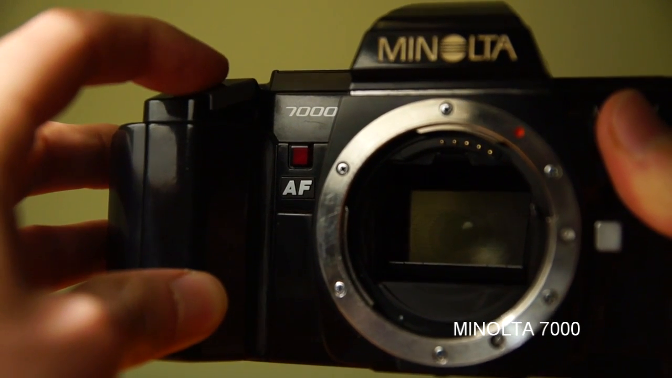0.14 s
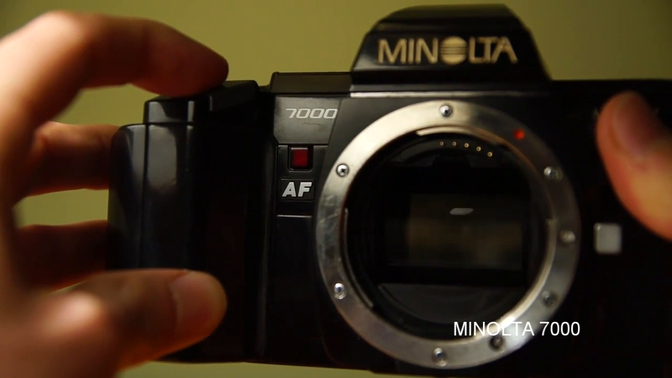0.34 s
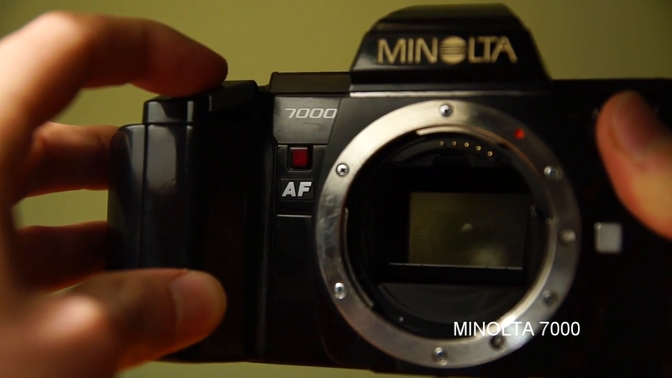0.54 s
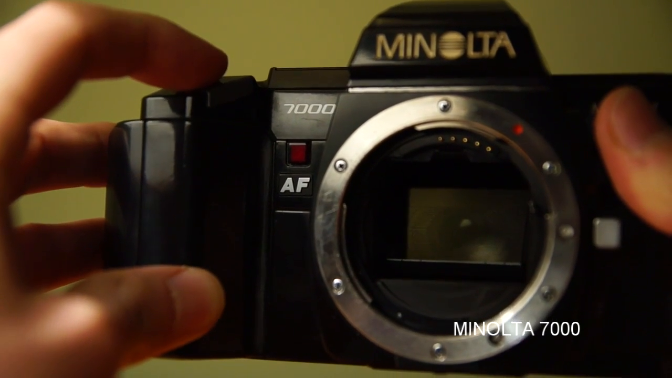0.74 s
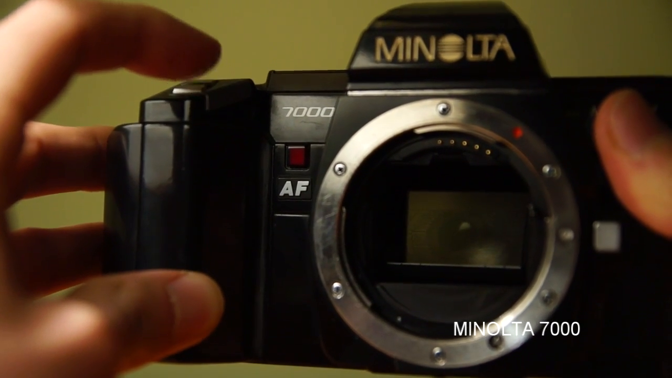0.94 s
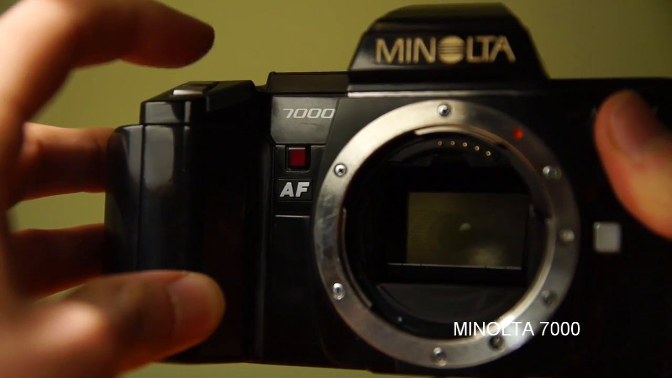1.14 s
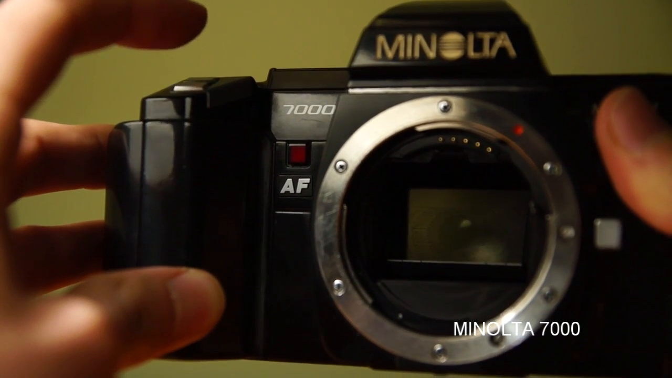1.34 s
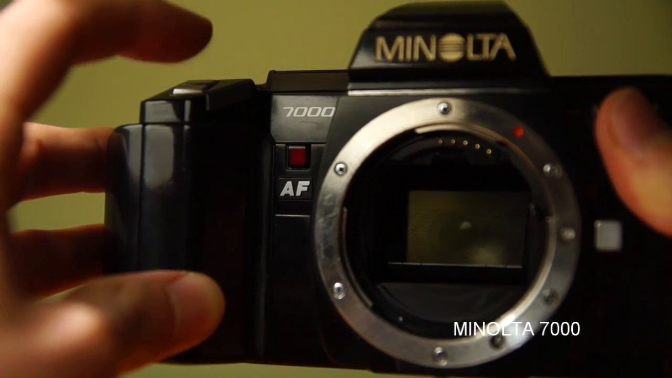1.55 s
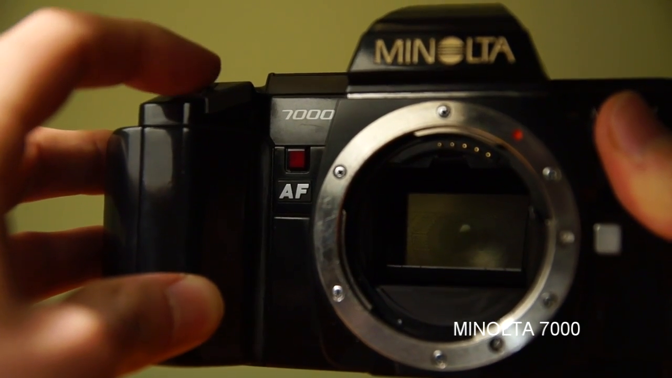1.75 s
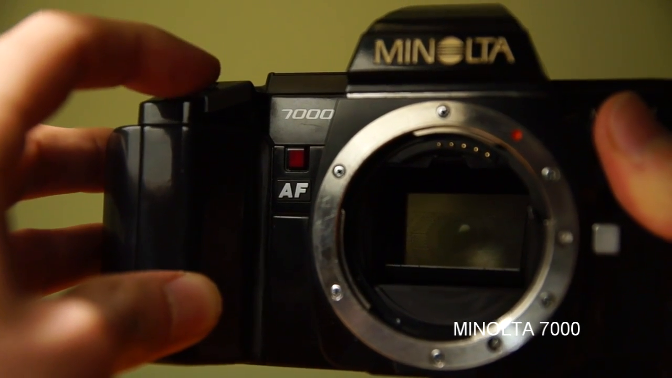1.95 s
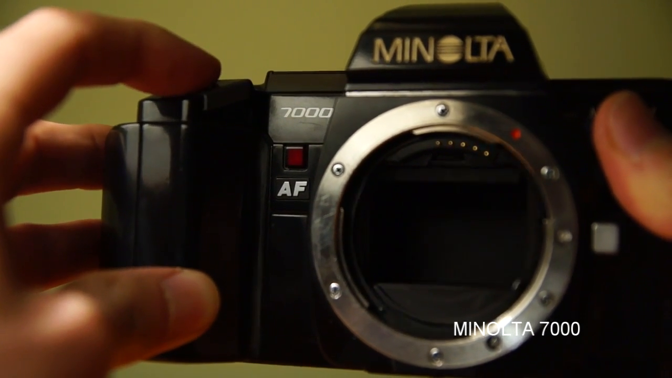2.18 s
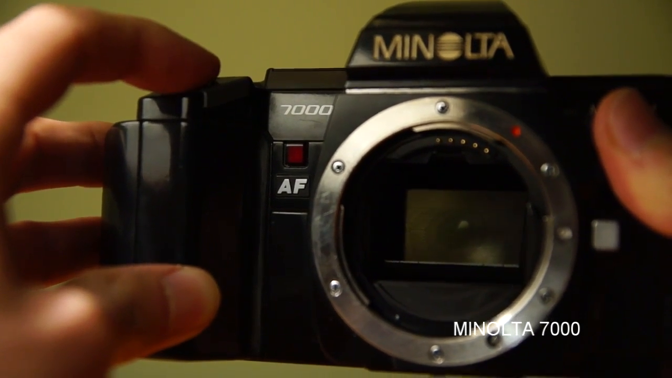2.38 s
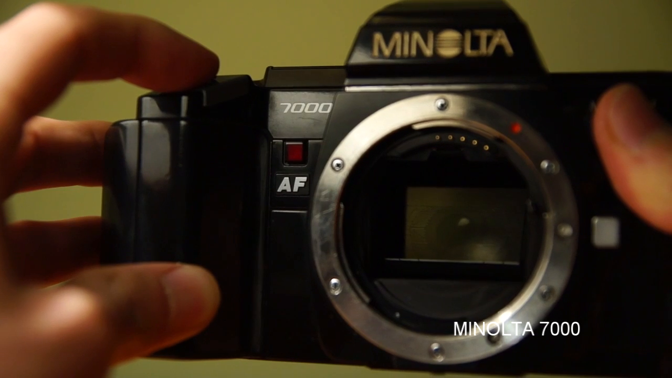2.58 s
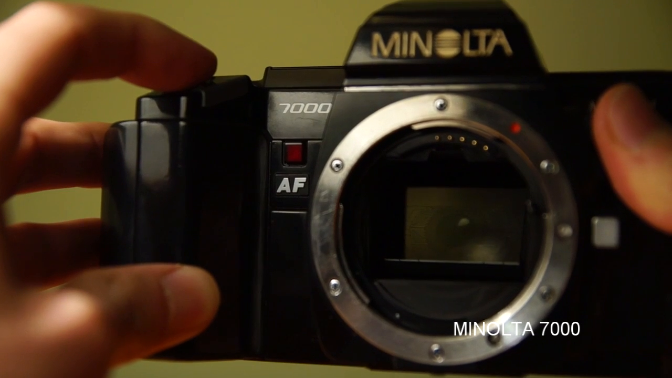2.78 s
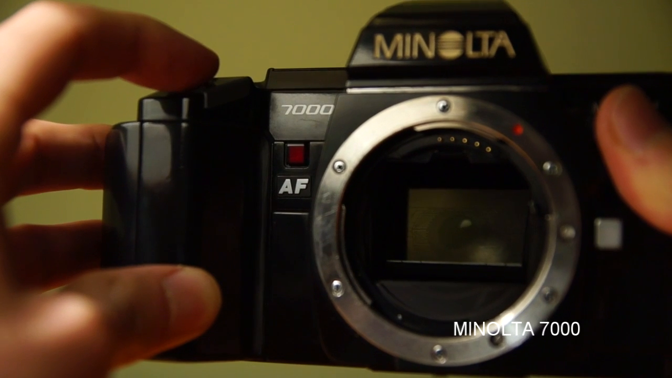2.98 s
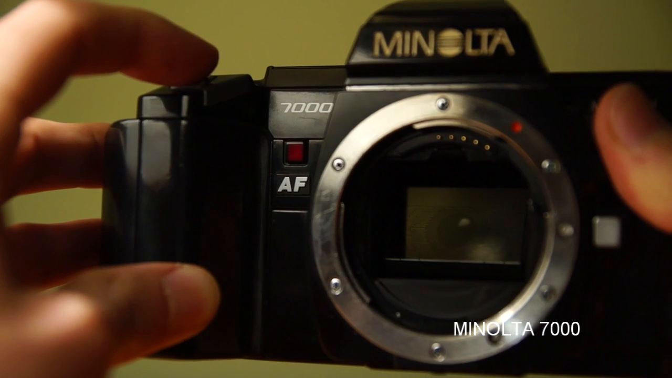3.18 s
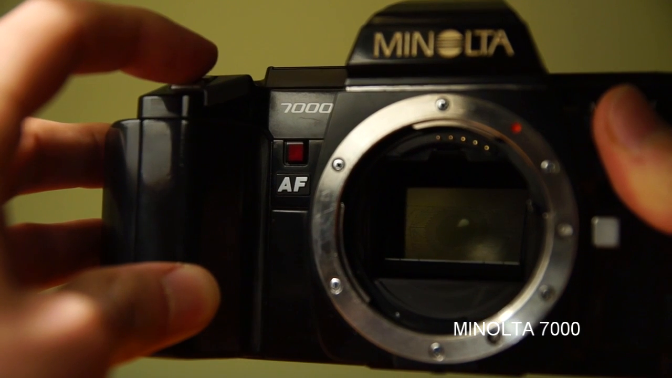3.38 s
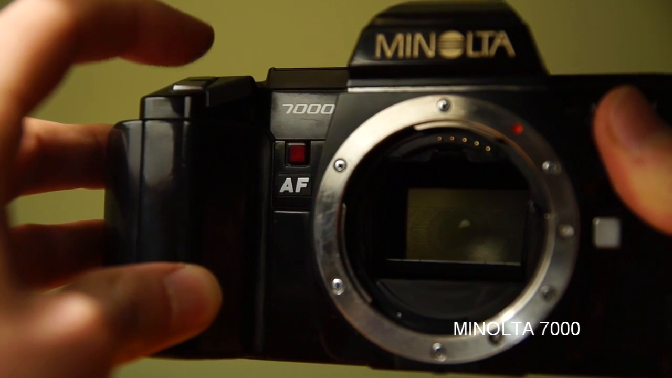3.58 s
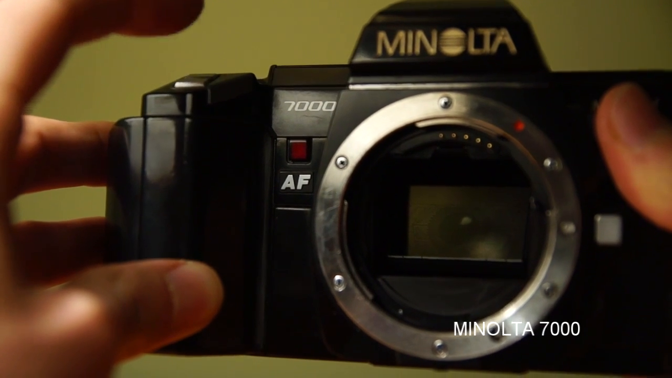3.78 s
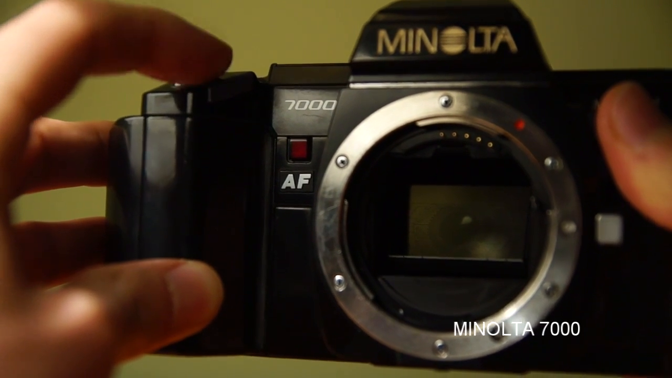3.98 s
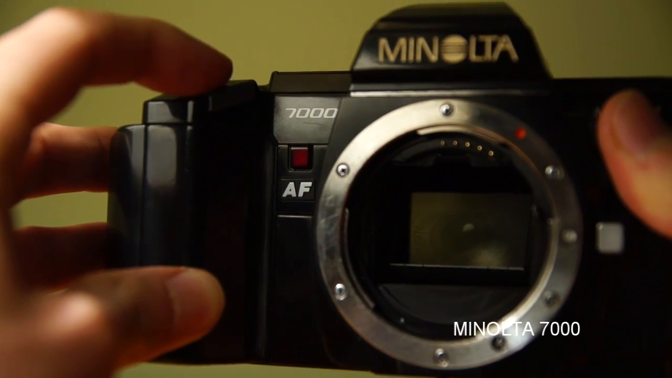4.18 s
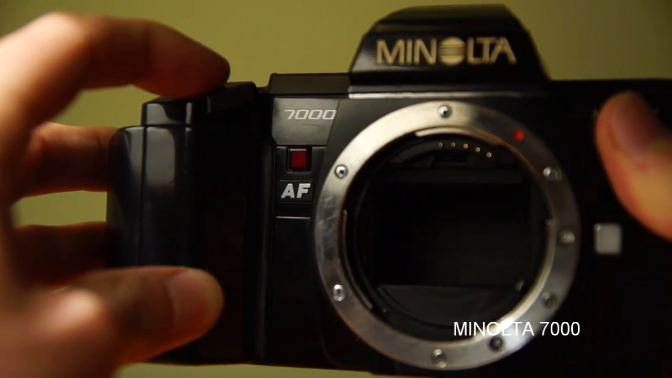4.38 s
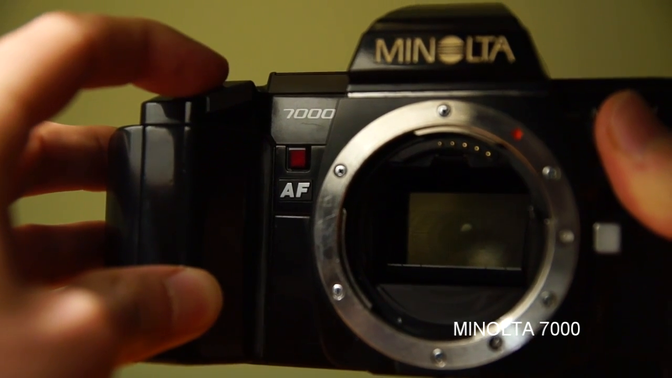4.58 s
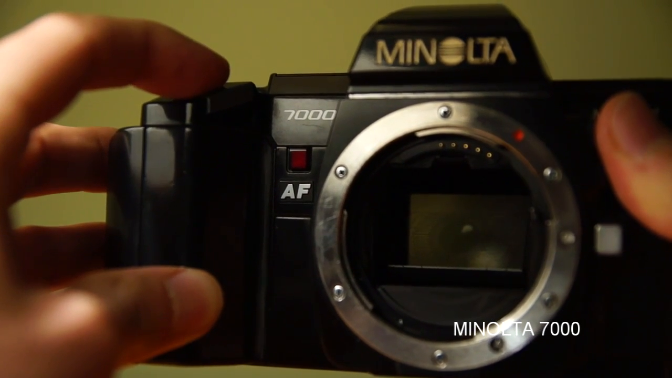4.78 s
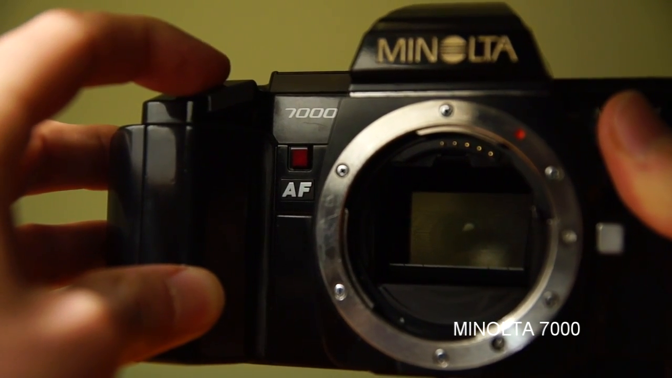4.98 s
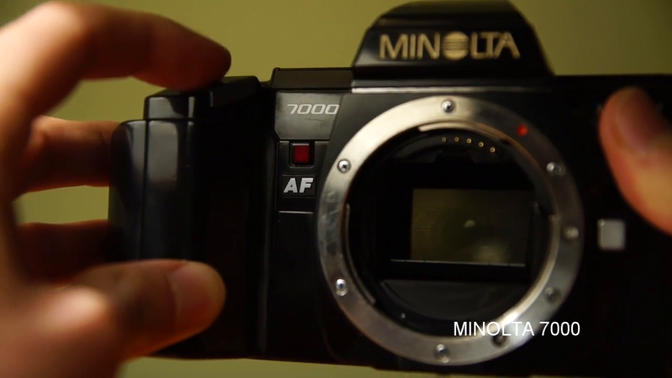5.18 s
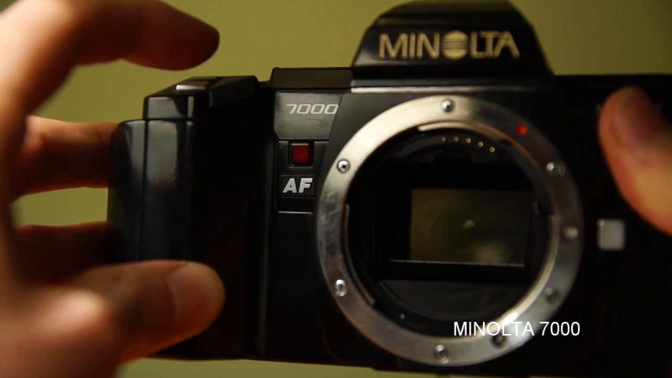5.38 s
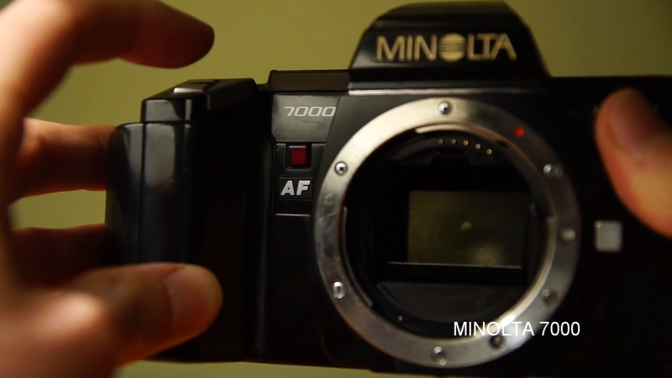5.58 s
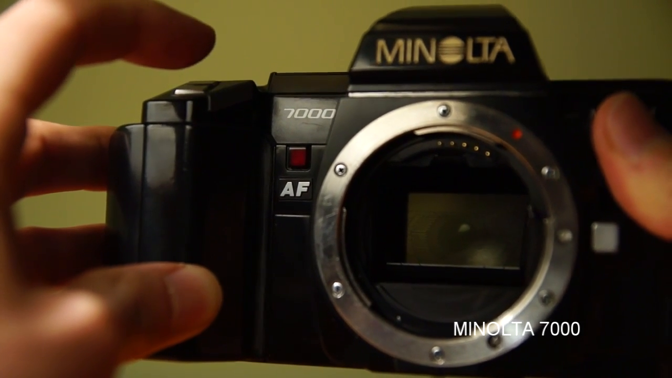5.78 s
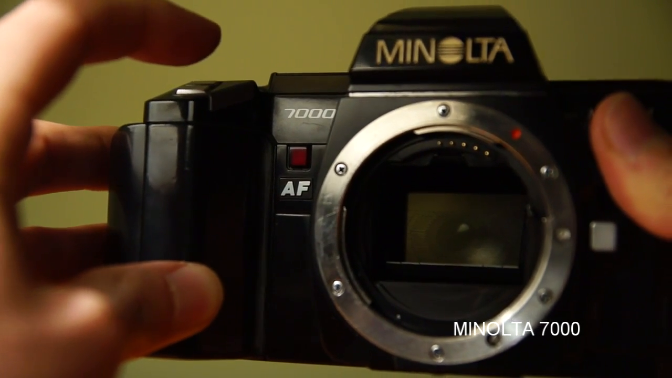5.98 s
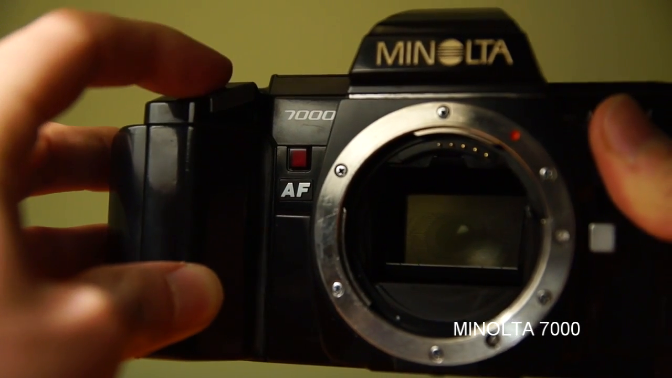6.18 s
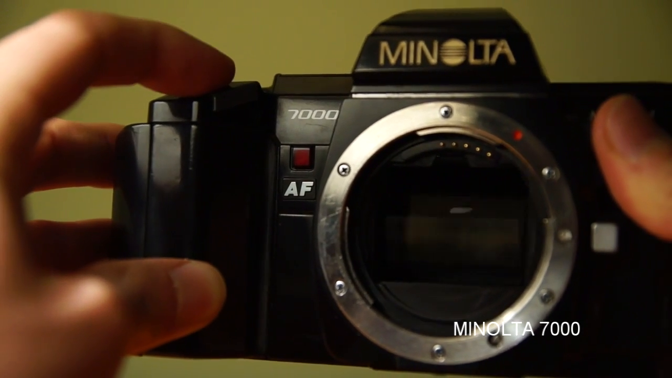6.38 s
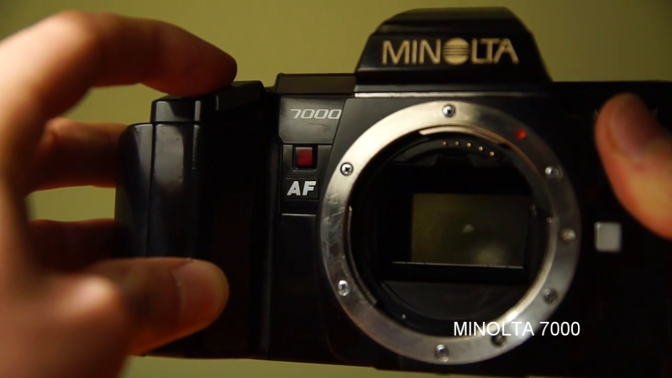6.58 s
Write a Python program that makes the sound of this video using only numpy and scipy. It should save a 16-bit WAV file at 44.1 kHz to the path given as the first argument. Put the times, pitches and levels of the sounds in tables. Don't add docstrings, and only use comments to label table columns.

```python
import sys
import numpy as np
from scipy import signal
from scipy.fft import rfft, irfft, next_fast_len
from scipy.io import wavfile
from scipy.ndimage import uniform_filter1d

SR = 44100
rng = np.random.default_rng(int(sys.argv[2]) if len(sys.argv) > 2 else 0)


def undo_db(level):
    steps = np.asarray(level, float) / 20
    return 10 ** steps


def file_out(sig):
    cols = np.atleast_2d(sig).T
    lim = np.clip(cols, -1, 1)
    pcm = np.round(lim * 32767).astype(np.int16)
    wavfile.write(sys.argv[1], SR, pcm)


N = 292824

# first shutter blade, shutter snap and start of winding, all in seconds.
RELEASES = [
    (.3334, .3411, .3695),
    (2.2618, 2.2701, 2.2964),
    (4.4402, 4.4474, 4.4748),
    (6.5242, 6.531, 6.558),
]
TRAVEL_S = .0003


def evened(x):
    return x / np.sqrt(np.mean(x ** 2) + 1e-20)


def read(points, hz):
    f, value = np.transpose(points)
    return np.interp(np.log(hz + 1), np.log(f + 1), value)


def paired(a, b, same):
    turn = np.arccos(np.clip(same, 0, 1)) / 2
    middle, side = np.cos(turn) * a, np.sin(turn) * b
    return np.array([middle + side, middle - side])


def add(mix, s, sound):
    part = mix[..., round(s * SR):][..., :sound.shape[-1]]
    part += sound[..., :part.shape[-1]]


def build_up(t, t60):
    return np.minimum(t / (.03 * t60), 1)


def all_knocks():
    # time in seconds, peak in dB, case over frame in dB,
    # sizzle (small bright parts) over frame in dB, ring of the struck part in Hz.
    ticks = [(.2152, -34.5, 1.5, -17, 2917), (4.3206, -40, 4.5, -17, 2970), (6.4084, -40, 6, -12.5, 2930),
             (0.9733, -49, 0.5, -18, 3000), (2.7064, -48, 9, -16, 2610), (2.847, -51, -3, -6, 2030),
             (3.157, -50, 2.5, 2, 4210), (4.853, -39.5, 1.5, -6, 2700), (5.128, -54, 5.5, -15, 1720),
             (5.27, -52, 4, -18, 3040), (5.288, -42.5, -0.5, -18, 2700), (6.181, -50.5, 1, -15, 2950)]
    lift_knocks = [
        (-.1125, -31.5, -9, -19.5, 1750),
        (-.1095, -29.5, -6, -16.5, 4500),
        (-.099, -26.5, -7, -17.5, 4680),
        (-.087, -20.5, -8.5, -15.5, 4550),
        (-.0735, -17.5, -11, -14, 4130),
        (-.0455, -13, -6, -6.5, 4210),
        (-.034, -16, -7.5, -14, 4330),
    ]
    snap = [
        (0.0002, -3.5, -13, -14, 4400),
        (.003, -15, -4, -8, 4500),
        (.0085, -19, -9, -14, 4600),
    ]
    wind_knocks = [(-.004, -25, 13.5, -9, 4300), (0.0001, -11, -22, -14, 4255),
                   (.0022, -14.5, -16, -9, 4250), (.0155, -13.5, -31, -18, 1850),
                   (0.033, -16.5, -10.5, -11, 4660), (.0415, -12, -10.5, -10, 4660),
                   (.058, -16, 0, -5.5, 1777), (.063, -23.5, -1, -17, 4430), (.07, -31, -6.5, -20, 3100),
                   (0.1561, -24, -13.5, -1, 6500), (0.202, -19.5, -15, -9.5, 3150),
                   (.211, -25.5, -7, -17, 4350), (0.229, -22, 6, -20, 4070),
                   (0.2363, -14.5, -2.5, -26.5, 1790), (0.242, -23, -2.5, -23.5, 1695)]
    cam = [
        (.054, -9, -7.5, -22, 1720),
        (0.0556, -8.5, -0.5, -18, 4520),
    ]
    latch = [
        (.1968, -20.5, -3, -2.5, 4940),
        (.1982, -8, -6.5, -4, 4090),
        (0.2015, -10.5, -3, -5.5, 4150),
        (.2065, -14.5, -29.5, -15.5, 4900),
    ]
    # peak in dB, case in dB, sizzle in dB, ring in Hz.
    blade = (-17, 0, -0.5, 4799.5)
    # snap, cam and latch in dB.
    extra_force = [
        (1.5, -1.5, 1),
        (1, 0.1, -1),
        (.5, -2, 1.5),
        (-3, 3.5, .1),
    ]
    uneven = [.0003, 2.1, 2.1, 2.1, 115.6]  # s, dB, dB, dB, Hz
    loose, sharp = [], []
    for (blade_s, snap_s, wind_s), force in zip(RELEASES, extra_force):
        loose += [(snap_s + s, *rest) for s, *rest in lift_knocks]
        loose += [(blade_s, *blade)]
        loose += [(wind_s + s, *rest) for s, *rest in wind_knocks]
        for at, part, force_db in zip([snap_s, wind_s, wind_s], [snap, cam, latch], force):
            sharp += [(at + s, db + force_db, *rest) for s, db, *rest in part]
    rows = np.array(loose + sharp)
    rows = np.vstack([ticks, rows + rng.uniform(-0.9, 1, rows.shape) * uneven])
    t60 = 0.047 + .0006 * rows[:, 3]
    t60[:len(ticks)] = 0.016
    t60[-len(sharp):] = .012
    return np.insert(rows, 4, np.maximum(t60, .003), axis=1)


def hiss():
    # pitch in Hz, level in dB.
    hiss_tone = [(20, -44), (130, -37.5), (175, -10), (225, 4), (280, -1), (500, 1), (1000, 1),
                 (2000, -5.5), (4000, -5.5), (8000, -16), (14000, -23)]
    # pitch in Hz, likeness of left and right (0 to 1).
    hiss_same = [(60, 0.92), (130, 0.74), (290, 0.49), (630, 0.37), (1380, 0.18), (3030, 0.1142),
                 (6640, 0.14), (14600, 0.05)]
    hz = np.fft.rfftfreq(N, 1 / SR)
    a, b = rfft(rng.standard_normal((2, N)))
    spectrum = paired(a, b, read(hiss_same, hz)) * undo_db(read(hiss_tone, hz))
    return undo_db(-60.5) * evened(irfft(spectrum, N))


def bumps(hits):
    swell = np.full(N, undo_db(-99.))
    scattered = rng.random((40, 2)) * [N / SR, 14] + [0, -88.5]
    around_knocks = np.c_[hits[:, 0] - .02, hits[:, 1] + .6 * hits[:, 3] - 59]
    for s, db in [*around_knocks, *scattered]:
        add(swell, s, undo_db(db) * np.hanning(2600))
    deep = signal.butter(3, 95, fs=SR, output="sos")
    a, b = signal.sosfilt(deep, rng.standard_normal((2, N)))
    return undo_db(4.5) * swell * evened(paired(a, b, .9))


def room(x):
    # pitch in Hz, time to fade by 60 dB in seconds.
    fade = [(300, 0.18), (1000, 0.29), (2000, .23), (4000, .23), (6000, 0.19), (12000, 0.15)]
    taps = np.zeros((2, SR // 2))
    at = np.arange(200, SR // 2 - 20, 20) + rng.integers(0, 20, (2, (SR // 2 - 201) // 20))
    np.put_along_axis(taps, at, rng.choice([-1., 1.], at.shape), 1)
    hz, t, z = signal.stft(taps, SR, nperseg=256)
    tail = signal.istft(z * undo_db(-60 * t / read(fade, hz)[:, None]), SR, nperseg=256)[1]
    return signal.fftconvolve(x, tail / np.linalg.norm(tail[0]), axes=1)[:, :N]


def springs():
    # start in seconds, pitch in Hz, level in dB, time to fade by 60 dB in seconds.
    hums = [
        (.61, 1245, -61, 1.2),
        (.61, 980, -63, 0.6),
        (2.54, 980, -65, .5),
        (4.715, 982, -62, 0.8),
    ]
    out, t = np.zeros(N), np.arange(SR // 2) / SR
    for s, hz, db, t60 in hums:
        fading = np.minimum(t / .005, 1) * undo_db(db - 60 * t / t60)
        add(out, s, fading * np.sin(2 * np.pi * hz * t))
    return out


def struck_parts(hits):
    out, t = np.zeros((2, N)), np.arange(3000) / SR
    chance = rng.uniform(-0.88, 1, (len(hits), 2))
    for (s, db, case_db, _, t60, hz), (split, lean) in zip(hits, chance):
        pair = np.sin(2 * np.pi * hz * t) + 0.37 * np.sin(2 * np.pi * hz * (1 + 0.13 * split) * t)
        ring = build_up(t, t60) * undo_db(db - 8 - 60 * t / (1.2 * t60)) * pair
        thud_hz = 412.6 * (1 + 0.32 * split)
        thud = np.minimum(t / .004, 1) * undo_db(db + case_db - 34 - 60 * t / 0.055)
        thud = thud * np.sin(2 * np.pi * thud_hz * t)
        sides = undo_db(2.5 * lean * np.array([[1], [-1]]))
        add(out, s + TRAVEL_S, sides * ring + thud)
    return out


def motor():
    # time from the snap in seconds, load in dB.
    lift_load = [
        (-.113, -18),
        (-.093, -5.5),
        (-.054, -0.3),
        (-.024, -3.5),
        (-.012, -8.5),
    ]
    # time from the start of winding in seconds, load in dB.
    wind_load = [
        (.004, -1.95),
        (.033, -4),
        (.072, -0.54),
        (.09, -7),
        (.143, -7.5),
        (.187, -6.5),
        (.223, -7.5),
        (.258, -19.5),
    ]
    lift_db, wind_db, follows = (-32, -32.5, -35.5), (-31.5, -28.5, -35.5), (1.01, 0.73, 1.3)
    tooth_hz, shaft_hz = 225.1, 102.4
    brake_s, coast_s = .07, .12
    t, strength = np.arange(N) / SR, np.zeros((3, N))
    wander = evened(uniform_filter1d(rng.standard_normal(N), size=400))
    since_tooth = np.cumsum(tooth_hz * (1 + .25 * wander)) / SR % 1
    teeth = np.exp(-since_tooth / .9)
    beat = evened(teeth * undo_db(0.5 * np.sin(2 * np.pi * shaft_hz * t) + 0.71 * wander))
    for _, snap_s, wind_s in RELEASES:
        for at, load, full, stop_s in [(snap_s, lift_load, lift_db, brake_s),
                                       (wind_s, wind_load, wind_db, coast_s)]:
            s, load_db = np.transpose(load) + [[at], [0]]
            running = np.clip((t - s[0]) / 0.0009, 0, 1) * undo_db(-60 * np.maximum(t - s[-1], 0) / stop_s)
            load_now = np.interp(t, s, load_db)
            strength += [running * undo_db(db + 2.0 + slope * load_now) for db, slope in zip(full, follows)]
    return strength * beat


def knocks(hits):
    power, t = np.zeros((3, N)), np.arange(3000) / SR
    lasting, trim_db = np.array([[1.01], [1.1], [.8]]), np.array([[-11], [-7], [-5.5]])
    for s, db, case_db, sizzle_db, t60, _ in hits:
        rattle, blow = undo_db(-60 * t / (lasting * t60)), 0.54 * undo_db(-60 * t / .004)
        level = undo_db(db + trim_db + np.array([[0], [case_db], [sizzle_db]]))
        add(power, s + TRAVEL_S, (level * build_up(t, t60) * (rattle + blow)) ** 2)
    return np.sqrt(power)


def ringing(modes, hz):
    response = 0
    for k, (f, w, db) in enumerate(modes):
        response = response + (-1) ** k * undo_db(db) * 1j * hz * w / (f * f - hz * hz + 1j * hz * w)
    return response / np.sqrt(np.mean(abs(response) ** 2))


def camera(hits):
    # pitch in Hz, width in Hz, level in dB.
    frame_modes = [(3990, 270, -2), (4250, 71, -0.5), (4330, 140, -1.5), (4680, 166, -6), (4790, 140, -3),
                   (5140, 200, -3), (5346, 510, -8.5)]
    case_modes = [(531, 140, -13), (732, 180, -10), (939, 33, -9.5), (988, 20, -9.5), (1213, 110, -7.5),
                  (1245, 5.7, -12.5), (1530, 290, -4.5), (1720, 87, -1), (1850, 90, -1.5), (2058, 59, -2.5),
                  (2219, 120, -4.5), (2543, 250, 0), (2723, 500, -1.5), (3024, 108, 2), (3228, 110, -2.5)]
    sizzle_modes = [(5970, 330, -1.5), (6640, 260, 5), (8090, 3300, -4), (10800, 500, 0),
                    (12800, 2860, -7.5)]
    # pitch in Hz, likeness of left and right (0 to 1).
    camera_same = [(60, 0.92), (99, 0.94), (160, 0.87), (270, 0.72), (440, 0.93), (730, 0.94), (1200, 0.88),
                   (1980, 0.76), (3260, 0.23), (5360, 0.36), (8840, 0.12), (14600, 0.04)]
    # pitch in Hz, left minus right in dB.
    camera_balance = [(60, 28.5), (110, -17), (200, 5.5), (370, -0.5), (690, 2), (1270, 0), (2330, 1),
                      (4300, 0.5), (7910, 0.5), (14600, -1.5)]
    size = next_fast_len(N + 4096)
    hz = np.fft.rfftfreq(size, 1 / SR)
    strength = np.hypot(motor(), knocks(hits))
    impacts = rng.standard_normal((2, 3, N)) * undo_db(1.4 * rng.standard_normal((2, 3, N)))
    impacts = evened(impacts) * strength
    spot_db, spot_s = 5, .012
    steps = rng.uniform(0, np.pi / 2, (3, int(N / SR / spot_s) + 2))
    turn = [np.interp(np.arange(N) / SR / spot_s, np.arange(len(row)), row) for row in steps]
    a = b = 0
    for k, modes in enumerate([frame_modes, case_modes, sizzle_modes]):
        modes = np.array(modes)
        favour = np.outer(spot_db * rng.uniform(-1.5, 1, len(modes)), [0, 0, 1])
        for share, spot in [(np.cos(turn[k]), modes + favour), (np.sin(turn[k]), modes - favour)]:
            left, right = rfft(impacts[:, k] * share, size) * ringing(spot, hz)
            a, b = a + left, b + right
    balance = undo_db(read(camera_balance, hz) * np.array([[.5], [-.5]]))
    small = (1j * hz / (420 + 1j * hz)) ** 2
    return irfft(paired(a, b, read(camera_same, hz)) * balance * small, size)[:, :N]


def scene():
    hits = all_knocks()
    near = camera(hits) + struck_parts(hits) + springs()
    return near + undo_db(-9.5) * room(near) + bumps(hits) + hiss()


def roll_off(x):
    return signal.sosfilt(signal.butter(12, 15160, fs=SR, output="sos"), x)


def record(dry):
    # pitch in Hz, width in Hz, depth in dB.
    dips = [
        (595, 160, -12),
        (1385, 330, -12),
        (2380, 420, -20),
        (3480, 600, -11),
    ]
    size = next_fast_len(N + 4096)
    hz = np.fft.rfftfreq(size, 1 / SR)
    colour = 1 / (1 + (hz / 14050) ** 120) + undo_db(-42) / (1 + (hz / 15200) ** 40)
    for f, width, db in dips:
        away = f * f - hz * hz
        colour = colour * (away + 1j * hz * width * undo_db(db)) / (away + 1j * hz * width)
    mix = irfft(rfft(dry, size) * colour, size)[:, :N] - .00244
    return roll_off(mix)


dry = scene()
out = record(dry)
file_out(out)
```